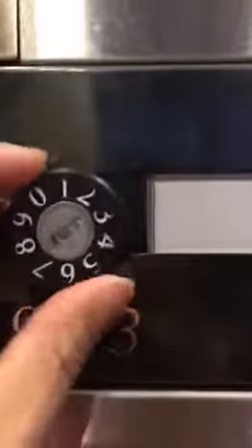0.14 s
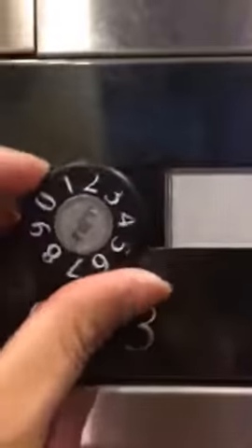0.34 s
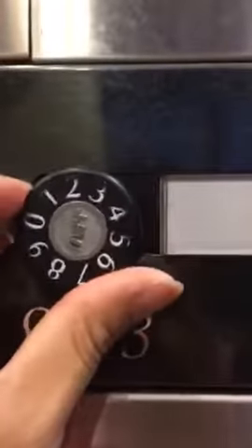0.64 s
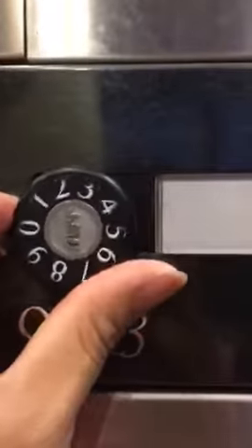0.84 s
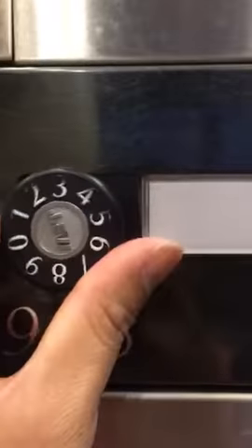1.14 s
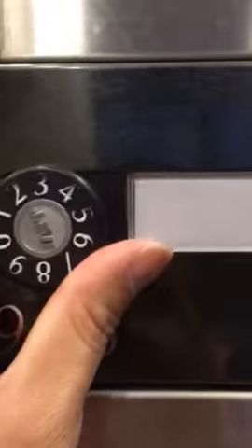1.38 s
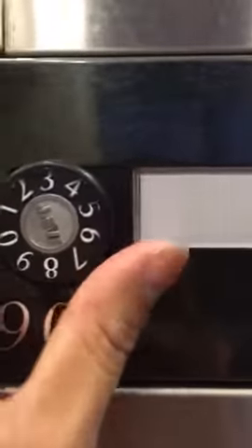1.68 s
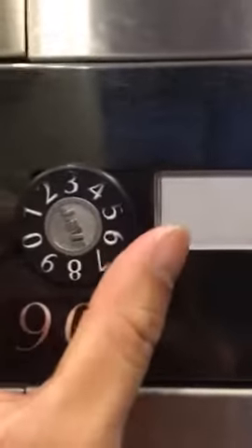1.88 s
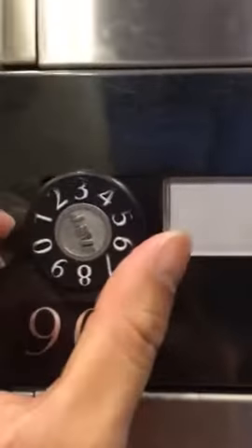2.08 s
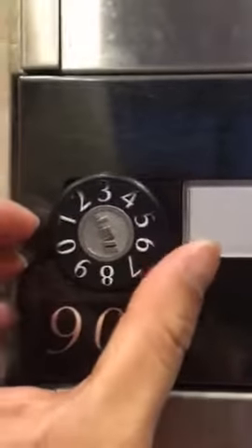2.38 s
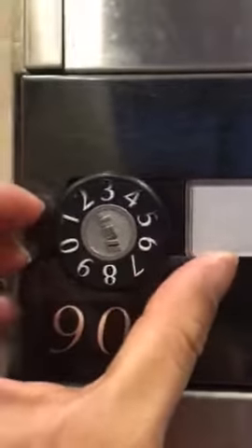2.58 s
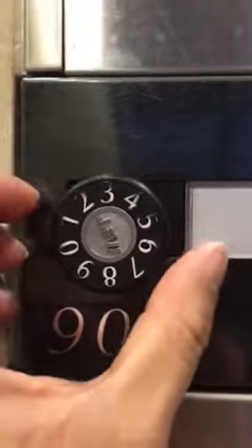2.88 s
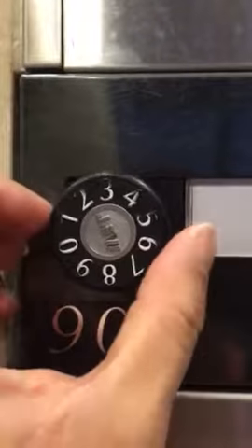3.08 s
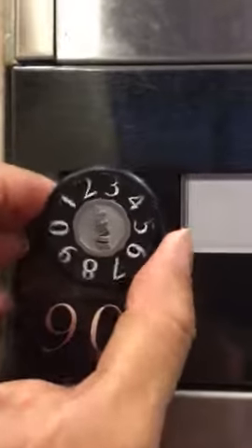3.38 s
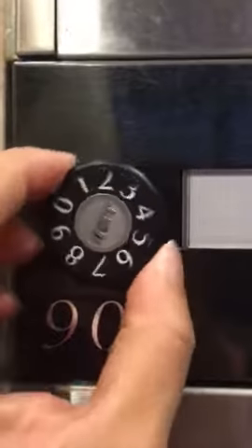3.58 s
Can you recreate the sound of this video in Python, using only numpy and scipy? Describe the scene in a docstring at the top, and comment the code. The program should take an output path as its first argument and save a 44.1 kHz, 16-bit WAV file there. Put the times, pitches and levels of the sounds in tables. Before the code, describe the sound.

A combination dial on a sheet-metal locker clicks sharply three times, about half a second apart, with tiny ticks and faint rubbing between; then near quiet, and two light ticks at the end, recorded close by phone indoors.

```python
"""Combination dial on a locker door

A metal dial on a sheet-metal locker door is turned by hand, close to a phone microphone.
Each detent snap rattles for a few milliseconds and excites the door's damped modes; lighter ticks
and slips do so more weakly, and a faint rub is a train of tiny random catches.
Behind it lie shaped hall noise and resonant ventilation hum; late on, a distant engine note
of two harmonics swells and rises."""
import sys
import numpy as np
from scipy import signal
from scipy.io import wavfile
from scipy.ndimage import uniform_filter1d

SR = 44100
rng = np.random.default_rng(int(sys.argv[2]) if len(sys.argv) > 2 else 0)


def file_out(sig):
    """Save sig as 16-bit WAV at sys.argv[1]."""
    # one column per channel
    cols = np.atleast_2d(sig).T
    # limit, then scale
    lim = np.clip(cols, -1, 1)
    pcm = np.round(lim * 32767).astype(np.int16)
    wavfile.write(sys.argv[1], SR, pcm)


def makeup_ratio(level_db):
    """Linear amplitude ratio for a level in decibels (20 dB per factor of ten)."""
    decades = np.asarray(level_db, float) / 20
    return 10 ** decades


N = 164493  # samples, about 3.73 s

# All decibel columns are relative unless marked rms.
# Detent snaps, light ticks of the dial's play, and faint slips of the detent just before a click:
# time_s, level_db, panel_db, upper_ring_db, treble_db, favoured_hz
SNAPS = [(0.0024, -27, -13, -1.5, 1.5, 2240), (0.5652, -30, -6.5, -2, 4.5, 580),
         (1.2157, -30.5, -13, -0.5, 3.5, 930)]
TICKS = [(0.2577, -65, 2, -15, -11, 2700), (0.2943, -57, -5, -15, -14, 2800),
         (0.3154, -64, -5, -12, -14, 4300), (0.3492, -52, -4.5, -11.5, -11, 2640),
         (0.631, -62, -7, -12, -8, 4400), (0.748, -50, -1, -2.5, -2, 1580), (0.756, -50, 0, -8, -4, 557),
         (0.7866, -58.5, -2, -18, -16, 2350), (1.2852, -56, -2, -8, -13, 1580),
         (1.3414, -52.5, -15, -0.5, -5, 3060), (1.5702, -62.5, -19, -2, 1, 9600),
         (1.575, -60, 3, -12, -10, 960), (1.6195, -55.5, -4.5, -5.5, -13, 4400),
         (3.132, -66, -1, -8, 0, 8500), (3.3309, -45.5, -4, -8, -9, 2840), (3.3382, -54.5, -5, 0, 4, 1580),
         (3.5879, -42.5, -3.5, -2, -3, 4540), (3.6505, -56, -7, -10, -7, 2770),
         (3.716, -62, -0.5, -6, -16, 2800)]
SLIPS = [(0.345, -60, -10, -11, -12, 4300), (0.554, -60.5, -11, -7, -14, 2800),
         (3.578, -60.5, -11, -9, -3, 8500)]
# How each kind is struck: rise_s, rattle_s, share of the full ring time (ratio)
SNAP_SHAPE = (.0006, 0.0039, 0.96)
TICK_SHAPE = (0.00117, 0.0022, 0.74)
SLIP_SHAPE = (0.00143, 0.013, 0.89)
# Separate modes of door and dial: mode_hz, level_db, full_t60_s
DOOR_MODES = [(519, -2, 0.25), (627, -2.5, 0.24), (792, -11, 0.23), (987.6, 4.5, .11), (1437, -22, 0.13),
              (1580, 2, .11), (2020, -7.5, 0.044), (2350, -5.5, .06), (2584, -5.5, 0.07),
              (2852, -5.5, 0.052), (3364, -8, 0.094), (3664, -23.5, 0.28), (4280, -11.5, 0.06),
              (4330, 0, 0.033), (4630, -8.5, 0.051), (5530, 3, 0.028), (5922, -4.5, .05)]
# Colour of the crowded small modes: frequency_hz, colour_db
CROWD_COLOUR = [(330, -35), (480, 1.5), (1000, 1.5), (1500, 0.5), (1800, -10), (2400, -9.5), (4000, -6.5),
                (6000, -4), (7600, -12.5), (9500, -10.5), (13700, -10), (15700, -5), (16600, -27.5)]
# Full ring time of the crowded modes: frequency_hz, full_t60_s
CROWD_T60 = [(500, 0.2), (2000, 0.16), (6000, 0.082), (15000, 0.056)]
# Colour of the hall's answer: frequency_hz, colour_db
HALL_COLOUR = [(500, -1.5), (2000, -0.5), (4000, -4.5), (7000, -3.5), (15000, 1)]
# Decay of the hall's answer: frequency_hz, t60_s
HALL_T60 = [(500, 0.14), (2000, 0.26), (6000, 0.3), (15000, 0.23)]
# Dial rubbing on its seat while it turns: time_s, rms_db
RUB_LEVEL = [(0.1, -75), (0.16, -70), (0.23, -70.5), (0.33, -68), (0.38, -66), (0.43, -82), (1.56, -84),
             (1.6, -74), (1.66, -76), (1.72, -85), (3.53, -91), (3.62, -70.5), (3.73, -79)]
# Colour of one catch of the rub: frequency_hz, colour_db
RUB_COLOUR = [(400, -25), (650, 4.5), (1500, 1), (3000, -1.5), (5500, -9), (8000, -18), (14000, -12.5)]
# Decay of one catch: frequency_hz, t60_s
GRAIN_T60 = [(600, 0.026), (10000, 0.018)]
# Distant engine note: time_s, pitch_hz, level_db (rms of the fundamental)
ENGINE = [(2.72, 42.2, -49), (2.9, 45.6, -46), (3.0, 50.03, -45), (3.1, 51.6, -49), (3.2, 51.4, -48),
          (3.3, 53.7, -69)]
# Hum of the ventilation ducts: centre_hz, pole_width_hz, level_db
DUCTS = [(176.7, 17.2, -57.5), (199.4, 12, -68.5), (289.5, 8.8, -65.5), (411, 16.2, -71), (561, 15, -78)]
# Swell shared by those duct tones: time_s, gain_db
DUCT_SWELL = [(0, -3.5), (1.5, -2.5), (2.8, 2), (3.73, -0.5)]
# Lowest duct tone: time_s, rms_db
LOW_DUCT_LEVEL = [(0, -58), (.9, -54.5), (1.4, -56), (2, -56.5), (2.2, -72), (2.65, -62), (2.9, -58),
                  (3.3, -61), (3.73, -55.5)]
# Low rumble: time_s, rms_db
RUMBLE_LEVEL = [(0, -39), (.2, -53.5), (.6, -59.5), (1.5, -52.5), (2.1, -58), (2.45, -66), (2.7, -61),
                (3.3, -59), (3.73, -57)]
# Colour of the hall and microphone noise: frequency_hz, colour_db
AIR_COLOUR = [(13, -24.5), (22, -11), (48, -2), (65, -9.5), (95, 2), (126, -9.5), (176, -7), (252, -9.5),
              (289, -13.5), (381, -17.5), (415, -21.5), (562, -22.5), (900, -31.5), (1160, -26.5),
              (1570, -34.5), (3220, -39), (4880, -46), (15200, -48), (16500, -65.5)]


def evened(x):
    """Normalisation: scales a signal to rms 1."""
    return x / np.sqrt(np.mean(x ** 2) + 1e-20)


def read(points, hz):
    """Logarithmic pitch scale: interpolates a table along log frequency."""
    f, value = np.transpose(points)
    return np.interp(np.log(hz + 1), np.log(f + 1), value)


def level_curve(points):
    """Amplitude envelope: straight lines in dB between (time_s, level_db) points."""
    return makeup_ratio(np.interp(np.arange(N) / SR, *np.transpose(points)))


def add(mix, time_s, sound):
    """Superposition: adds a sound into the mix from the given time."""
    start = max(round(time_s * SR), 0)
    part = mix[start:][:len(sound)]
    part += sound[:len(part)]


def dying(colour_db, t60s, size, hold_s=0., share=1., cycles=1e-3):
    """Frequency-dependent damping: each noise band builds over some cycles, holds, then decays."""
    hz, t, z = signal.stft(rng.standard_normal(size), SR, nperseg=256, noverlap=224)
    t60 = read(t60s, hz)[:, None] * share
    decay_db = 60 * np.maximum(t - hold_s, 0) / t60
    build = 1 - np.exp(-(t + 1e-3) * hz[:, None] / cycles)
    z = z * makeup_ratio(colour_db(hz)[:, None] - decay_db) * build
    return signal.istft(z, SR, nperseg=256, noverlap=224)[1][:size]


def click(level_db, panel_db, upper_db, treble_db, favour_hz, rise_s, rattle_s, share):
    """Modal excitation: a brief uneven rattle rings separate modes and a crowd of small ones."""
    def weight_db(hz):
        """Spectral weighting: four regions plus a bump, 0.18 octave wide, at the favoured pitch."""
        octaves = np.log2((hz + 1) / favour_hz)
        favour_db = 5 * np.exp(-(octaves / 0.18) ** 2)
        regions = [hz < 1750, hz < 4100, hz < 7200]
        return favour_db + np.select(regions, [panel_db, 0., upper_db], treble_db)

    build_cycles = 1.17
    t = np.arange(9000) / SR
    hz, db, t60 = np.transpose(DOOR_MODES)[:, :, None]
    scatter_db = 3 * rng.standard_normal((len(DOOR_MODES), 1))
    phase = rng.random((len(DOOR_MODES), 1))  # in cycles
    build = 1 - np.exp(-t * hz / build_cycles)
    decay_db = 60 * np.maximum(t - rattle_s, 0) / t60 / share
    ring = makeup_ratio(db + weight_db(hz) + scatter_db - decay_db)
    modes = .5 * (build * ring * np.sin(2 * np.pi * (hz * t + phase))).sum(0)

    def crowd_db(f):
        """Spectral density: the crowd's colour under the same weighting."""
        return read(CROWD_COLOUR, f) + weight_db(f)

    crowd = 2 * makeup_ratio(2.5) * dying(crowd_db, CROWD_T60, len(t), rattle_s, share, build_cycles)
    # smoothed noise makes the level uneven, ever less as the rattle dies
    uneven = evened(uniform_filter1d(rng.standard_normal(len(t)), size=30))
    uneven = uneven * np.exp(-t / (2 * rattle_s))
    onset = 1 - np.exp(-(t / rise_s) ** 2)
    body = makeup_ratio(level_db + 1.5 * uneven) * onset * (modes + crowd)
    return signal.sosfilt(signal.butter(4, 502, "high", fs=SR, output="sos"), body)


def dial():
    """Linear superposition: snaps, ticks and slips, convolved with the hall's short answer."""
    out = np.zeros(N)
    for table, shape in ((SNAPS, SNAP_SHAPE), (TICKS, TICK_SHAPE), (SLIPS, SLIP_SHAPE)):
        for time_s, *levels in table:
            # start early by the rise time, so that the onset is strong at time_s
            add(out, time_s - shape[0], click(*levels, *shape))
    hall = dying(lambda f: read(HALL_COLOUR, f), HALL_T60, size=SR // 2)
    hall = hall / np.linalg.norm(hall)
    return out + makeup_ratio(-12.5) * signal.fftconvolve(out, hall)[:N]


def rub():
    """Stick-slip friction: scattered tiny catches between dial and seat stir the door briefly."""
    catches_per_s, spread_db = 900, 3.5
    odds, size = rng.random(N), rng.exponential(1, N)
    strength = makeup_ratio(spread_db * np.minimum(size, 4))
    catches = (odds < catches_per_s / SR) * strength * rng.choice([-1., 1.], N)
    grain = dying(lambda f: read(RUB_COLOUR, f), GRAIN_T60, size=3000)
    return level_curve(RUB_LEVEL) * evened(signal.fftconvolve(catches, grain)[:N])


def engine():
    """Harmonic source: a gliding fundamental and its octave share one accumulated phase."""
    octave_db, fade_s = -7, 0.11
    s, hz, db = np.transpose(ENGINE)
    t = np.arange(N) / SR
    phase = 2 * np.pi * (np.cumsum(np.interp(t, s, hz)) / SR + rng.random())
    gate = np.clip(np.minimum(t - s[0], s[-1] - t) / fade_s, 0, 1)
    tone = np.sin(phase) + makeup_ratio(octave_db) * np.sin(2 * phase)
    return np.sqrt(2) * gate * makeup_ratio(np.interp(t, s, db)) * tone


def band(hz, width):
    """Narrow-band resonance: complex noise through two equal poles, shifted to hz, at rms 1."""
    turn = np.exp(2j * np.pi * hz * np.arange(N) / SR)
    r = np.exp(-np.pi * width / SR)
    x = rng.standard_normal(N + SR) + 1j * rng.standard_normal(N + SR)
    settled = signal.lfilter([1], np.convolve([1, -r], [1, -r]), x)[SR:]
    return evened((turn * settled).real)


def hum():
    """Resonant ducts: narrow noise bands give fuzzy tones over a low rumble of changing level."""
    rumble = level_curve(RUMBLE_LEVEL) * band(47, 30)
    low = level_curve(LOW_DUCT_LEVEL) * band(92, 17)
    ducts = sum(makeup_ratio(db) * band(hz, width) for hz, width, db in DUCTS)
    return rumble + low + level_curve(DUCT_SWELL) * ducts


def air():
    """Stationary shaped noise: broad hall and microphone noise with faint drifting patches."""
    frames, hz = N // 1024 + 5, np.fft.rfftfreq(4096, 1 / SR)
    a, b, patches = rng.standard_normal((frames, len(hz), 3)).T
    patches = uniform_filter1d(patches, size=30, axis=0)  # across frequency
    patches = evened(uniform_filter1d(patches, size=6, axis=1))  # across time
    z = (a + 1j * b) * makeup_ratio(read(AIR_COLOUR, hz)[:, None] + 1.3 * patches)
    return makeup_ratio(-53) * evened(signal.istft(z, nperseg=4096, noverlap=3072)[1][:N])


def scene():
    """Superposition of independent sources: dial, rub, hall air, hum and engine."""
    return (dial() + rub() + air() + hum() + engine())[None]


def low_pass(x):
    """Removes everything above the highest recorded frequency."""
    return signal.sosfilt(signal.butter(12, 16820, fs=SR, output="sos"), x)


def record(dry):
    """Band limitation: the microphone's bass roll-off at 33.6 Hz and a steep edge at 16.6 kHz."""
    edge = signal.firwin(255, 16600, window=("kaiser", 8), fs=SR)[None]
    thin = signal.sosfilt(signal.butter(6, 33.6, "high", fs=SR, output="sos"), dry)
    mix = signal.oaconvolve(thin, edge, "same")
    return low_pass(mix)


dry = scene()
out = record(dry)
file_out(out)
```